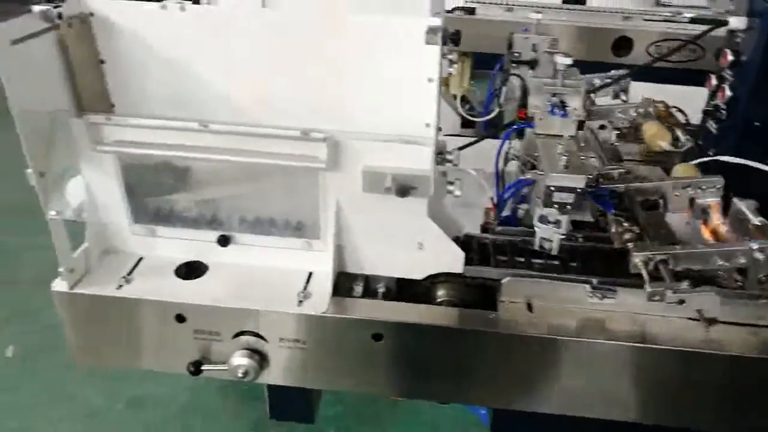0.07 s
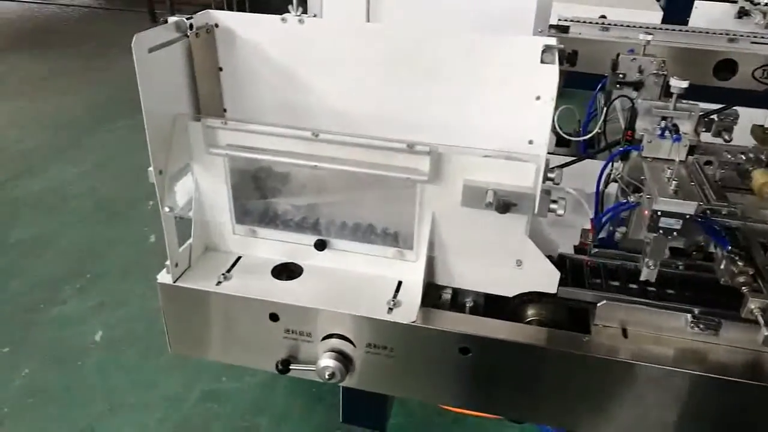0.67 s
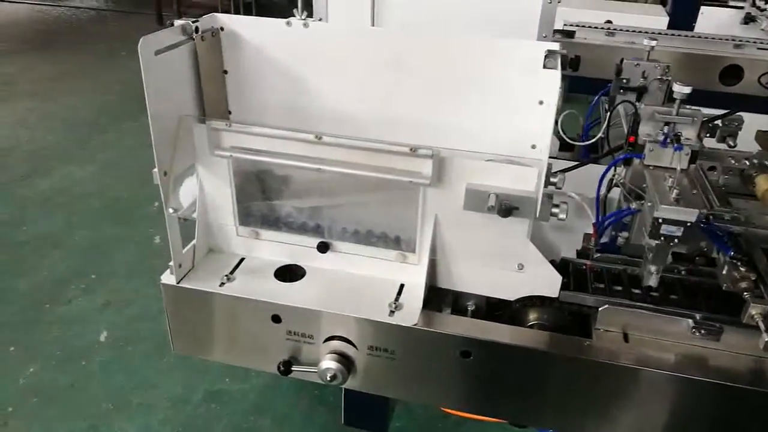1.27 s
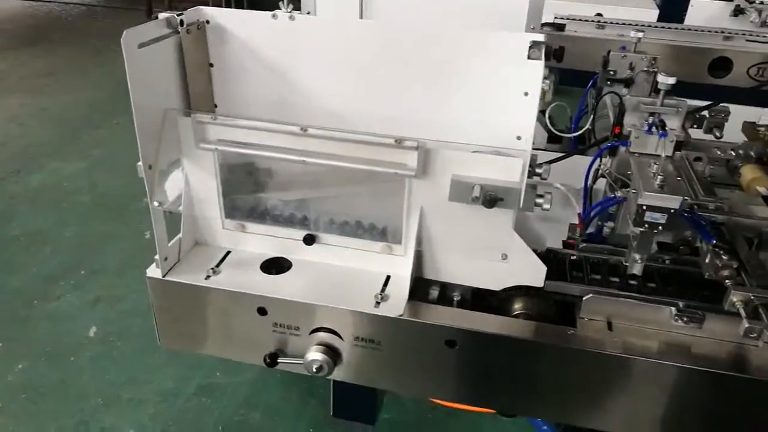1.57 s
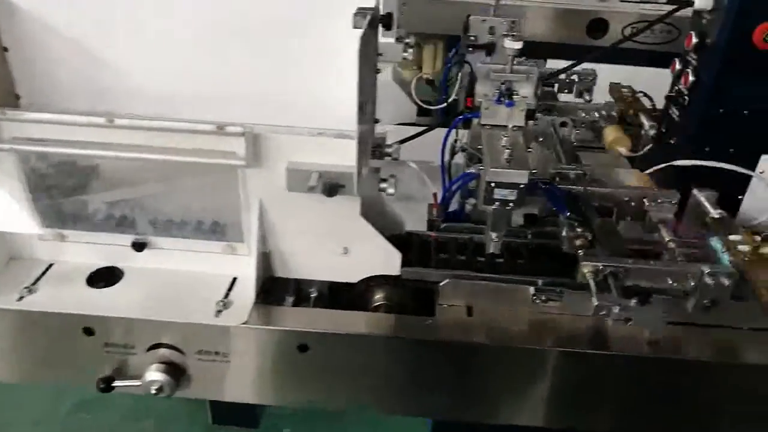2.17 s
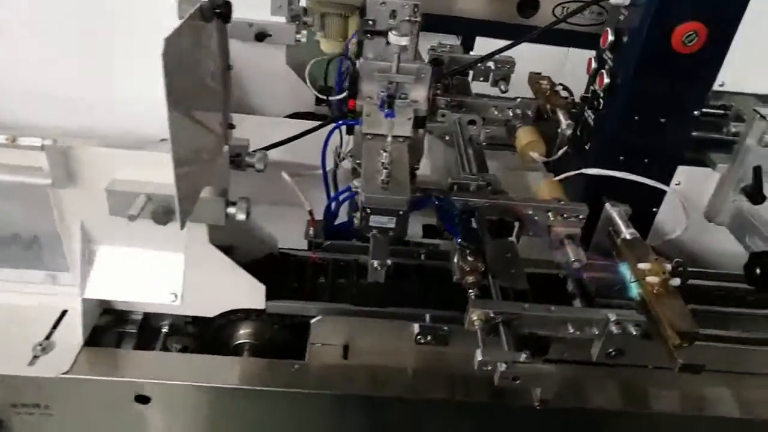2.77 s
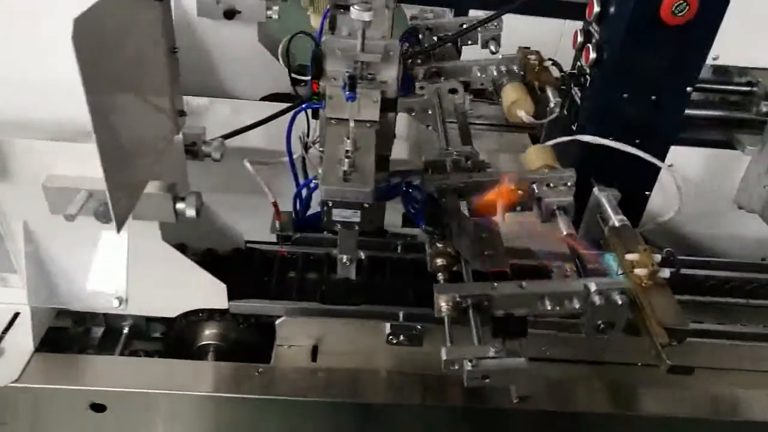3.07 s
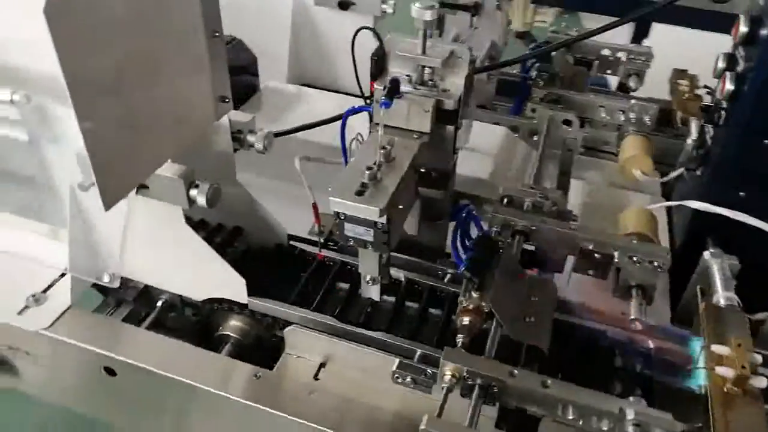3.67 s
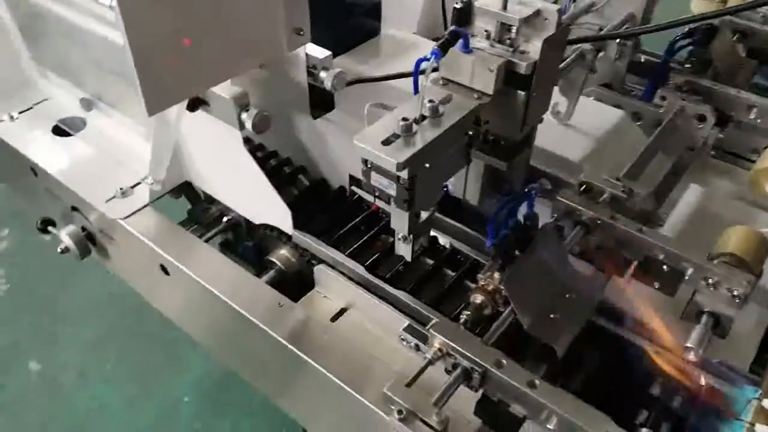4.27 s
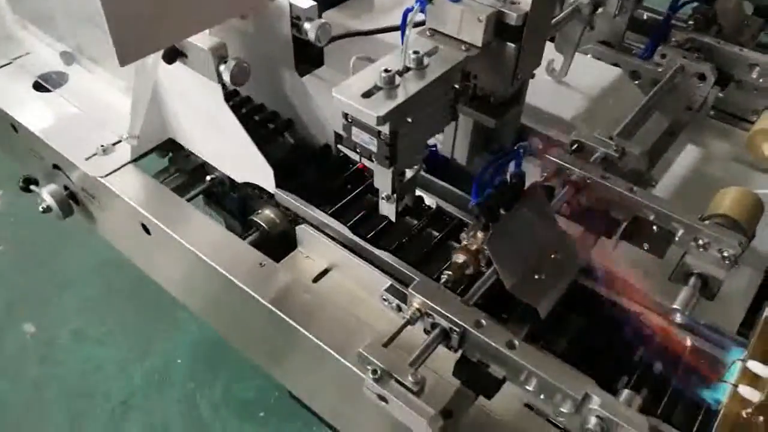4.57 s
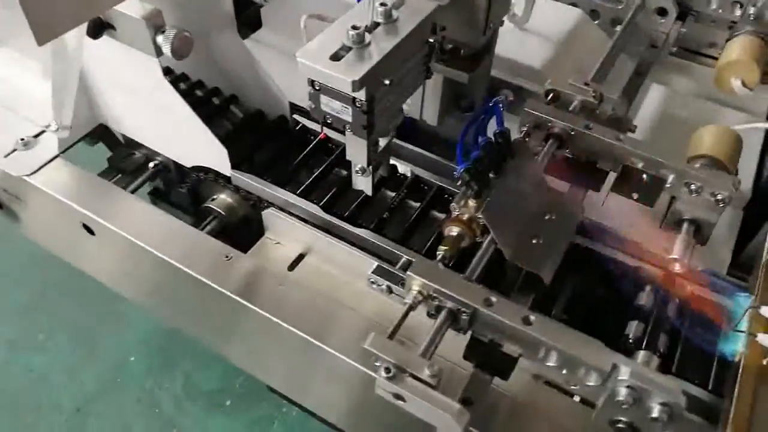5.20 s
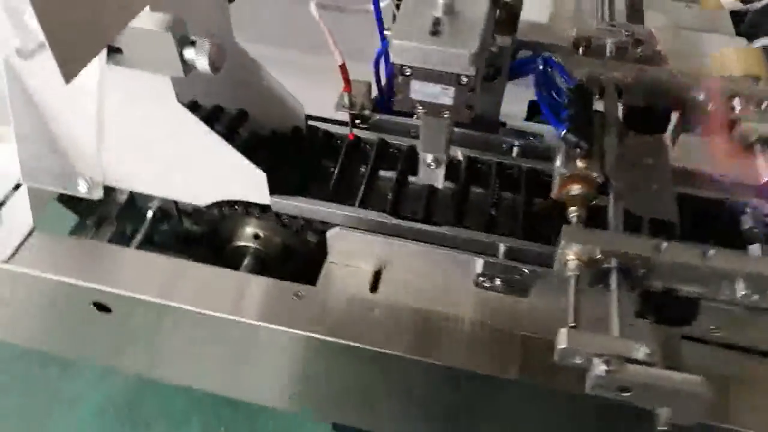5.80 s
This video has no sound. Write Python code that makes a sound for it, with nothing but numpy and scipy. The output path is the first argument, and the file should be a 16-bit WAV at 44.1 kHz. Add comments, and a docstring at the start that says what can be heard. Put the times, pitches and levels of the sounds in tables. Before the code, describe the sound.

An automatic screen printer runs close by in a workshop for about six seconds, with only a short echo. Its steel mechanism slams about once a second: at the start, then near 0.9, 1.9, 2.9, 3.9, 4.8 and 5.8 seconds. Each cycle is a cluster of knocks and rattles around the snap of a slide, followed a third of a second later by the crack and ring of the print head. A small latch chatters in between. Underneath, the motor rumbles and hums, a conveyor chain ticks and gears whirr softly. From about 3 seconds the strokes ring more brightly and a gas burner's thin, uneven whistle grows stronger. Faint high squeaks come near 1.7, 2.6 and 5.6 seconds, and hollow clonks near 4.7 and 5.6. From about 5 seconds the clatter shifts to the left.

```python
"""Steel clatters and slams about once a second: an automatic screen printer, close by in a workshop.
In each cycle linkages knock on the frame, a slide hits its stop, a latch rings and the print head lands;
each impact excites resonances that ring and decay. Beneath them the drive rumbles and hums, a conveyor
chain ticks, gears whirr and a gas burner sings, with an occasional clonk or squeak.
Near the end the listener turns, and the works shift to the left."""
import sys
import numpy as np
from scipy import signal
from scipy.fft import rfft, irfft
from scipy.io import wavfile

SR = 44100
rng = np.random.default_rng(int(sys.argv[2]) if len(sys.argv) > 2 else 0)


def master(y):
    """Save y as 16-bit WAV."""
    cut = np.clip(np.atleast_2d(y).T, -1, 1)
    pcm = np.round(cut * 32767)  # scale
    wavfile.write(sys.argv[1], SR, pcm.astype(np.int16))


N = 261954
TIME = np.arange(N) / SR

# Machine cycles. Each row: time of the slide's stop in seconds, then in relative dB the stop, its sparkle,
# the bar's ring, and the changes of the knocks' thud, clang and tick.
CYCLES = [(-0.021, -18, -48, -30, -0.11, -0.13, 0), (0.948, -19.5, -55, -43, -1, 1.4, 0),
          (1.915, -21.5, -56, -39, 0.015, -1.3, -1.5), (2.883, -19.5, -35, -23, 0.17, -1.33, 0),
          (3.8534, -19.5, -27.5, -16, 0.15, -1.1, -0.5), (4.8237, -18.5, -30.5, -14.5, 0.94, 2.54, 0.5),
          (5.7919, -16.5, -27, -23, -0.27, 0.53, 4)]
# Modes of the steel parts. Each row: frequency in Hz, bandwidth in Hz, relative level in dB.
FRAME_MODES = [(1508, 45, -19), (1820, 70, -19), (2050, 90, -14), (2247, 16, -12), (2310, 60, -16),
               (2600, 70, -12), (3023, 35, -13), (3553, 30, -20), (4381, 30, -28)]
LATCH_MODES = [(2200, 60, -15), (2820, 150, -10), (3025, 55, 0), (5590, 110, -17), (6830, 90, -22),
               (7320, 120, -17), (12300, 160, -28)]
STOP_MODES = [(3400, 300, -7), (4650, 300, 0), (5800, 400, -2)]
# Spectrum of a hard steel contact. Each row: frequency in Hz, relative gain in dB.
CONTACT_SPECTRUM = [(290, -18), (500, -16), (792, -9.5), (927, -6.5), (1070, -17), (1450, -5), (1600, -25),
                    (2200, -1), (2650, -3), (4020, -13), (5830, -6.5), (10800, -31), (12500, -16),
                    (15500, -28)]


def linkages(thud_change_db, clang_change_db, tick_change_db):
    """Impact excitation: arms and cams knock, so the bed thuds, the frame clangs and small parts tick."""
    # Each row: delay from the stop in seconds; strike, thud, clang and tick in relative dB;
    # rattle T60 in seconds.
    knocks = [(-0.144, -12, -27, -23.5, -26.5, 0.075), (-0.076, -12, -26.5, -26, -30.5, 0.11),
              (-0.058, -9, -30.5, -28.5, -25.5, 0.14), (-0.031, -22, -43, -31.5, -35, 0.09),
              (0.052, -9.5, -28, -31, -35.5, 0.22), (0.076, -13.5, -34, -29, -26.5, 0.06),
              (0.199, -15, -42, -29.5, -29.5, 0.071), (0.223, -24, -37, -23.5, -28.5, 0.11),
              (0.239, -12, -34, -26, -33, 0.09), (0.266, -2, -41, -27, -21, 0.04),
              (0.285, -7, -32.5, -29.5, -26.5, 0.038), (0.311, -10, -29, -22, -23, 0.075),
              (0.335, -6, -29, -26.5, -27, 0.14), (0.378, -15, -31, -30.5, -43.5, 0.33),
              (0.452, -9, -36, -42, -42, 0.26)]
    # Spectra of bed, frame and small parts. Each row: frequency in Hz, relative gain in dB.
    thud_spectrum = [(30, -54), (60, -9), (120, -0.5), (200, -14), (320, 0), (420, -16), (600, -30),
                     (1500, -60)]
    clang_spectrum = [(250, -39), (520, -2), (750, 7), (1150, -3), (1650, -3.5), (2100, 9), (2700, -2.5),
                      (3300, -9), (4200, -15), (8000, -53.5)]
    tick_spectrum = [(1800, -22.5), (3400, 2.5), (4600, -4), (6000, 1), (7400, -0.5), (8400, 0),
                     (10000, -4.5), (11200, -4.5), (12400, -8), (13500, 1.5), (15500, -6.5)]
    # Loose washers and springs. Each row: frequency in Hz, bandwidth in Hz, relative level in dB.
    jingle_modes = [(3548, 40, -7), (3820, 23, -9.5), (4405, 10, -14.5), (5610, 43, -4), (6800, 72, -4.5),
                    (7360, 70, -2), (9440, 90, -13.5), (12307, 90, -8), (12962, 56, -15)]
    cycle, s, strike_db, thud_db, clang_db, tick_db, t60 = each_cycle(knocks)
    chance_db = .9 * rng.standard_normal(len(s))  # no two cycles are quite alike
    thud_db = thud_db + thud_change_db[cycle] + chance_db
    clang_db = clang_db + clang_change_db[cycle] + chance_db
    tick_db = tick_db + tick_change_db[cycle] + chance_db
    thud = blows(s, thud_db, t60, rise_s=.002, uneven_db=1, loose_db=2, alike=.97)
    frame = blows(s, clang_db, t60, rise_s=.001, uneven_db=4.5, loose_db=4.5, alike=.65)
    tick = blows(s, tick_db, t60, rise_s=.004, uneven_db=5.5, loose_db=3.5, alike=.1)
    frame += from_db(.5) * strikes(s, strike_db)
    clang = from_db(-1.5) * colour(frame, clang_spectrum) + from_db(-4) * resonate(frame, FRAME_MODES)
    jingle = from_db(2) * colour(tick, tick_spectrum) + from_db(-8) * resonate(tick, jingle_modes)
    return from_db(3.5) * colour(thud, thud_spectrum), clang + jingle


def slide(stop_db, stop_sparkle_db):
    """A brief contact has a broad spectrum: the slide snaps against its stop, rebounds and rattles."""
    # Each row: delay from the stop in seconds, changes of peak and sparkle in dB, rattle T60 in seconds.
    rebounds = [(0.0, -1.5, 1, 0.095), (0.0095, -7.5, 1, 0.1), (0.022, -10, -8.5, 0.32)]
    # Treble of the contact. Each row: frequency in Hz, relative gain in dB.
    sparkle_spectrum = [(5000, -25), (7500, -2.5), (9000, -3), (11000, -5.5), (12400, 3), (13500, 2),
                        (15500, -8)]
    cycle, s, change_db, sparkle_change_db, t60 = each_cycle(rebounds)
    peak_db = stop_db[cycle] + change_db
    sparkle_db = stop_sparkle_db[cycle] + sparkle_change_db
    force = blows(s, peak_db, t60, rise_s=.0003, uneven_db=4, loose_db=5.5, alike=.2)
    impact = blows(s, peak_db, t60 / 6, rise_s=.0001, uneven_db=2, loose_db=1, alike=.6)
    sparkle = blows(s, sparkle_db, t60 / 2, rise_s=.0008, uneven_db=3.5, loose_db=4, alike=.2)
    rattle = from_db(-2.5) * colour(force, CONTACT_SPECTRUM) + from_db(-3) * resonate(force, FRAME_MODES)
    snap = resonate(impact, STOP_MODES)
    return rattle + snap + from_db(10) * colour(sparkle, sparkle_spectrum)


def latch():
    """Inharmonic modes: a small steel latch, dropped or shaken, chatters and rings like a dull bell."""
    # Each row: start in seconds, chatter and ring in relative dB, rattle T60 in seconds.
    drops = [(0.134, -22.5, -26.5, 0.12), (0.527, -22, -31, 0.13), (1.0993, -23, -29.5, 0.48),
             (2.0706, -23, -25.5, 0.11), (2.346, -20.5, -32, 0.089), (2.6318, -27, -30, 0.089),
             (3.045, -15, -20.5, 0.1), (4.0098, -20, -27, 0.2), (4.976, -18, -29, 0.081),
             (4.9891, -44, -14, 0.078), (5.5996, -42, -29, 0.28)]
    # Each row: frequency in Hz, relative gain in dB.
    chatter_spectrum = [(500, 4.5), (900, 1.5), (1250, -6), (2000, 6.5), (2900, -7), (3500, -30),
                        (4100, -41), (5100, 4), (5650, 1), (6400, 2), (7350, 11.5), (8700, -6),
                        (11000, -13), (12300, -1), (15000, -10.5)]
    s, peak_db, ring_db, t60 = np.transpose(drops)
    chatter = blows(s, peak_db, t60, rise_s=.004, uneven_db=4.5, loose_db=4, alike=.3)
    bounces = blows(s, ring_db, t60, rise_s=.003, uneven_db=2, loose_db=4, alike=.6)
    ring = resonate(from_db(-1) * bounces + from_db(19) * strikes(s, ring_db), LATCH_MODES)
    return from_db(-1) * colour(chatter, chatter_spectrum) + ring


def print_head(bar_db):
    """Free vibration: the head lands with a crack, judders and leaves a steel bar ringing."""
    # Each row: frequency in Hz, bandwidth in Hz, relative level in dB.
    bar_modes = [(2247, 17, 0), (2320, 50, -5), (2680, 40, -11), (3550, 25, -12)]
    cycle, s = each_cycle([(.312,)])  # seconds after the stop
    each = np.ones(len(s))
    judder = blows(s, bar_db[cycle], t60s=.17 * each, rise_s=.003, uneven_db=1, loose_db=3, alike=.7)
    crack = blows(s, -28 * each, t60s=.03 * each, rise_s=.0002, uneven_db=4, loose_db=3, alike=.4)
    bar = resonate(from_db(-4.5) * judder + from_db(8) * strikes(s, bar_db[cycle]), bar_modes)
    return bar + resonate(crack, STOP_MODES) + from_db(-1) * colour(crack, CONTACT_SPECTRUM)


def clonks():
    """Damped resonance: a hollow part answers each knock with a few closely spaced modes."""
    # Each row: start in seconds, relative level in dB, T60 in seconds.
    knocks = [(4.672, -17.5, 0.069), (5.643, -16.5, 0.074)]
    # Each row: frequency in Hz, relative gain in dB.
    knock_spectrum = [(400, -30), (820, -21), (1050, 3), (1300, -2), (1600, -6), (3000, -25), (6500, -20),
                      (9000, -20), (15000, -18)]
    # Each row: frequency in Hz, bandwidth in Hz, relative level in dB.
    hollow_modes = [(1058, 39, 0), (1165, 90, 1.5), (1240, 90, -6)]
    s, peak_db, t60 = np.transpose(knocks)
    force = blows(s, peak_db, t60, rise_s=.003, uneven_db=1, loose_db=3, alike=.7)
    return from_db(-5.5) * colour(force, knock_spectrum) + from_db(-6.5) * resonate(force, hollow_modes)


def motor(rumble_db, octave_db):
    """Forced vibration: the drive rumbles in the hollow bed; its hum gains an octave under load."""
    # Each row: time in seconds, pitch in Hz, fundamental in relative dB, change of its octave in dB.
    hum_curve = [(0, 123.5, -46, -1), (1.1, 122, -40.5, -3), (2.6, 121.9, -42.5, -0.5), (3.3, 118, -48, 2),
                 (4.6, 118.4, -56, 0.5), (5.94, 120.1, -50, 2.5)]
    # Each row: frequency in Hz, relative gain in dB.
    rumble_spectrum = [(20, -20), (35, -2), (50, -0.5), (95, 2.5), (180, 0.5), (250, 5), (330, 0),
                       (370, -2.5), (450, -6), (600, -31), (1300, -61.5)]
    # Each row: frequency in Hz, bandwidth in Hz, relative level in dB.
    bed_modes = [(163, 17, -15), (208, 31, -4.5), (235, 32, -4), (276.4, 8.3, -6.5), (322.5, 19.5, -4.5),
                 (384.2, 13, -12.5), (420, 21, -20)]
    pitch_hz, fundamental_db, octave_change_db = in_time(hum_curve)
    phase = 2 * np.pi * np.cumsum(pitch_hz) / SR
    hum = sum(from_db(db + 2.5 * drift(6)) * np.sqrt(2) * np.sin(harmonic * phase + .7 * drift(5))
              for harmonic, db in [(1, fundamental_db), (2, octave_db + octave_change_db)])
    rumble = colour(noise(alike=.98) * from_db(rumble_db), rumble_spectrum)
    bed = resonate(noise(alike=.73) * from_db(rumble_db), bed_modes)
    return from_db(-4.5) * rumble + from_db(-9) * bed + hum


def chain(clatter_db, sizzle_db):
    """Random excitation: the conveyor's ticking links keep the frame ringing and the latch buzzing."""
    # Spectra of links and rollers. Each row: frequency in Hz, relative gain in dB.
    clatter_spectrum = [(300, -8.5), (520, -2.5), (650, 0.5), (850, 9), (1200, 2.5), (1650, 8), (2200, 15),
                        (2800, 3.5), (3300, -7), (4200, -9), (8000, -36.5)]
    sizzle_spectrum = [(2000, -9), (3500, -9), (4500, -8), (5700, 1), (6600, -3), (7350, 2.5), (8200, -5),
                       (10000, -7), (11200, -9.5), (12300, -4), (13300, -11), (15500, -19)]
    links = rms_one(noise(alike=.21) * from_db(.83 * drift(104) + 3.24 * drift(23))) * from_db(clatter_db)
    sizzle = rms_one(noise(alike=.14) * from_db(2.3 * drift(42))) * from_db(sizzle_db)
    buzz = from_db(-21.5) * resonate(links, LATCH_MODES)
    clatter = from_db(-5) * colour(links, clatter_spectrum) + from_db(-7) * resonate(links, FRAME_MODES)
    return buzz + clatter + from_db(-1.5) * colour(sizzle, sizzle_spectrum)


def gears():
    """Periodic tooth contact: two gear pairs whirr as the conveyor moves on, louder each cycle."""
    # Each row: frequency in Hz, relative level in dB.
    mesh_tones = [(386, -0.5), (204.5, 2)]
    delay_s, length_s, rise_db_per_s = .59, .2, 3.5
    _, times = each_cycle([(delay_s,)])
    envelope = swells([(s, length_s, -49.5 + rise_db_per_s * s) for s in times])
    return envelope * sum(from_db(db) * np.sin(2 * np.pi * hz * TIME + drift(10)) for hz, db in mesh_tones)


def burner():
    """Narrow resonances filter flow noise: gas sings unevenly in the burner's nozzle."""
    # Each row: time in seconds, relative level in dB.
    singing_curve = [(0, -50.5), (2.5, -42), (3.33, -35), (3.55, -44.5), (3.9, -36), (4.32, -31.5),
                     (4.39, -28.5), (4.7, -34.5), (5.2, -31.5), (5.6, -29.5), (5.94, -37)]
    # Each row: frequency in Hz, bandwidth in Hz, relative level in dB.
    nozzle_modes = [(2585, 50, 0), (2650, 80, -6)]
    level_db, = in_time(singing_curve)
    flutter_db = 2.5 * drift(14)
    return from_db(level_db + flutter_db - 7) * resonate(noise(alike=.27), nozzle_modes)


def squeaks(pitch_hz=8800):
    """Friction: a dry guide gives a thin, wavering tone between strokes."""
    # Each row: centre in seconds, length in seconds, relative level in dB.
    rubs = [(1.682, 0.067, -39.5), (2.643, 0.03, -41), (3.623, 0.067, -52), (5.56, 0.048, -39)]
    return swells(rubs) * np.sin(2 * np.pi * pitch_hz * TIME + 1.2 * drift(39.95))


def hall(x, t60_s=.16):
    """Reverberation: the hard floor and nearby walls add a diffuse tail, duller than the direct sound."""
    t = TIME[:SR]
    tail = rng.standard_normal((2, SR)) * np.exp(-np.log(1000) * t / t60_s) * (t > .006)
    tail /= np.sqrt(np.sum(tail ** 2, axis=1, keepdims=True))
    wet = signal.oaconvolve(x, tail, axes=1)[:, :N]
    return from_db(-5.5) * colour(wet, [(200, 0), (2500, 0), (6000, -7), (14000, -14)], keep_power=False)


def blows(times, levels_db, t60s, rise_s, uneven_db, loose_db, alike, size=8192):
    """Exponential decay of loose parts' chatter; loose_db roughens its level, uneven_db its spectrum."""
    out, t = np.zeros((2, N + size)), TIME[:size]
    chatter = rms_one(noise(alike) * from_db(loose_db * np.tanh(drift(260))))
    chatter = np.pad(chatter, ((0, 0), (0, size)))
    hz, knots_hz = np.arange(size // 2 + 1) * SR / size, np.geomspace(60, SR / 2, 130)
    ripples = np.clip(rng.standard_normal((len(times), len(knots_hz))), -2, 2)
    for s, db, t60, ripple in zip(times, levels_db, t60s, ripples):
        at = int(np.clip(s * SR, 0, N - 1))
        resonances = rms_one(from_db(uneven_db * np.interp(hz, knots_hz, ripple)))
        envelope = (1 - np.exp(-t / rise_s)) * np.exp(-np.log(1000) * t / max(t60, .01))
        burst = irfft(rfft(chatter[:, at:at + size]) * resonances)
        out[:, at:at + size] += from_db(db) * envelope * burst
    return out[:, :N]


def strikes(times, levels_db):
    """One ideal impulse for each hard contact."""
    out = np.zeros(N)
    out[np.clip(times * SR, 0, N - 1).astype(int)] = from_db(levels_db)
    return out


def swells(rows):
    """Rounded envelopes, each of a given centre, length and level."""
    return sum(from_db(db) * np.exp(-(2 * (TIME - s) / length) ** 4) for s, length, db in rows)


def resonate(x, modes):
    """Modal superposition; white noise of power 1 leaves each mode at its listed level."""
    out = 0
    for hz, width_hz, db in modes:
        r = np.exp(-np.pi * width_hz / SR)
        gain = from_db(db) * np.sqrt((1 - r * r) / 2)
        feedback = [1, -2 * r * np.cos(2 * np.pi * hz / SR), r * r]
        out = out + signal.lfilter([gain, 0, -gain], feedback, x + 1e-18)
    return out


def colour(x, spectrum, keep_power=True, size=8192):
    """Minimum-phase filter with the given spectrum."""
    hz, db = np.transpose(spectrum)
    gain = from_db(np.interp(np.log(np.arange(size // 2 + 1) * SR / size + 1), np.log(hz), db))
    cepstrum = irfft(np.log(rms_one(gain) if keep_power else gain))
    cepstrum[1:size // 2] *= 2  # folding the cepstrum makes the response causal
    cepstrum[size // 2 + 1:] = 0
    response = irfft(np.exp(rfft(cepstrum)))
    return signal.oaconvolve(x, response[None], axes=1)[:, :N]


def noise(alike):
    """Partly coherent white noise: the two channels share the fraction alike of their power."""
    return np.sqrt(alike) * rng.standard_normal(N) + np.sqrt(1 - alike) * rng.standard_normal((2, N))


def drift(rate_hz, step=40):
    """Low-passed noise of spread 1 that wanders at about rate_hz."""
    r = np.exp(-2 * np.pi * rate_hz * step / SR)
    slow = signal.lfilter([1], [1, -2 * r, r * r], rng.standard_normal(N // step + 2002))[2000:]
    return np.interp(np.arange(N) / step, np.arange(len(slow)), rms_one(slow))


def each_cycle(rows):
    """Repeat one cycle's events: the cycle that each belongs to, its time, and its other columns."""
    stops = np.array(CYCLES)[:, 0]
    events = np.array([(k, stop + delay, *rest) for k, stop in enumerate(stops) for delay, *rest in rows])
    cycle, *columns = events[(events[:, 1] >= 0) & (events[:, 1] < N / SR)].T
    return cycle.astype(int), *columns


def in_cycle(rows):
    """Each column of a curve that repeats with the machine, at every sample."""
    stops = np.array(CYCLES)[:, 0]
    s, *columns = np.transpose(rows)
    return [np.interp(TIME - stops[0], s, c, period=np.diff(stops).mean()) for c in columns]


def in_time(rows):
    """Each column of a curve at every sample."""
    s, *columns = np.transpose(rows)
    return [np.interp(TIME, s, c) for c in columns]


def pan(x, balance_db):
    """A level difference gives direction; positive is left."""
    return x * from_db([balance_db / 2, -balance_db / 2])


def from_db(db):
    """Decibels to gain."""
    return 10 ** (np.asarray(db) / 20)


def rms_one(x):
    """Scale to unit power."""
    return x / np.sqrt(np.mean(x ** 2) + 1e-20)


def scene():
    """Superposition: level and time differences place the works; the bass reaches both sides alike."""
    # The drive rests while the head comes down, then pulls the conveyor on. Each row: delay from the stop
    # in seconds, then rumble, chain clatter, chain sizzle and hum octave in relative dB.
    drive_cycle = [(-0.26, -32.5, -35, -46, -39), (-0.17, -27.5, -35, -41.5, -34.5),
                   (-0.1, -32, -31.5, -37.5, -45), (-0.055, -25, -30, -41.5, -38.5),
                   (0.01, -27.5, -27, -32, -39), (0.07, -28, -31.5, -40, -57), (0.13, -35, -33, -41, -55),
                   (0.175, -37.5, -29, -35.5, -55), (0.25, -33.5, -32.5, -32, -58),
                   (0.335, -22, -22.5, -32.5, -34), (0.42, -27.5, -31, -43, -38.5),
                   (0.52, -29, -39, -51.5, -35.5), (0.62, -30.5, -33, -44.5, -35.5)]
    # The listener turns and leans in. Each row: time in seconds, then in dB the pan of the strokes,
    # the pan of the running sounds, and the gains of deep bass, drive and chain.
    listener_path = [(0, -2.5, 0.5, -3, 1, 2), (1.5, -1.5, 1, -4, -1, -1.5),
                     (2.4, -1, 0.5, -0.5, -1.5, 0.5), (3.3, -1, -1.5, -3, 0.5, -1),
                     (4.55, -1, 0, -2.5, 0, -0.5), (5.0, 0, 1.5, -5, 3.5, -1.5), (5.3, 4, 7, -3, 0, 2.5),
                     (5.94, 6, 10, -4, 0.5, 2.5)]
    _, stop_db, sparkle_db, bar_db, thud_db, clang_db, tick_db = np.transpose(CYCLES)
    rumble_db, clatter_db, sizzle_db, octave_db = in_cycle(drive_cycle)
    strokes_pan_db, running_pan_db, deep_db, drive_db, chain_db = in_time(listener_path)
    thud, clank = linkages(thud_db, clang_db, tick_db)
    strokes = clank + slide(stop_db, sparkle_db) + latch() + print_head(bar_db) + clonks()
    running = chain(clatter_db + chain_db, sizzle_db + chain_db) + burner() + squeaks()
    works = pan(strokes + hall(strokes), strokes_pan_db) + pan(running, running_pan_db)
    # Small steel parts radiate little bass.
    left, right = signal.sosfilt(signal.butter(2, 110, "high", fs=SR, output="sos"), works)
    left = np.interp(TIME - 17 / SR, TIME, left)  # arrives 0.39 ms later
    bass = from_db(drive_db) * (thud + motor(rumble_db, octave_db)) + gears()
    deep = signal.sosfiltfilt(signal.butter(2, 150, fs=SR, output="sos"), bass)
    return np.array([left, right]) + bass + (from_db(deep_db) - 1) * deep


def record(dry):
    """Acoustic shadow: the left side faces away from the works and is duller; both lose the top treble."""
    # Response of each side. Each row: frequency in Hz, gain in dB.
    left_response = [(100, -3), (400, -2.5), (700, -9.5), (1050, 0.5), (1450, 3.5), (2050, -5), (2600, 1.5),
                     (3500, 1), (5000, -4.5), (7000, -15), (8500, -23.5), (15000, -32.5)]
    right_response = [(100, -3), (400, -4), (700, 0), (1050, 5.5), (1450, 4.5), (2050, 3), (2600, 7.5),
                      (3500, 3), (5000, 4), (7000, 3), (15000, -13)]
    left = colour(dry[:1], left_response, keep_power=False)
    right = colour(dry[1:], right_response, keep_power=False)
    lowpass = signal.ellip(10, .2, 90, 15600, fs=SR, output="sos")
    return signal.sosfilt(lowpass, np.vstack([left, right]))


dry = scene()
out = record(dry)
master(out)
```